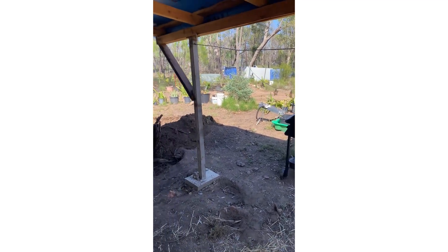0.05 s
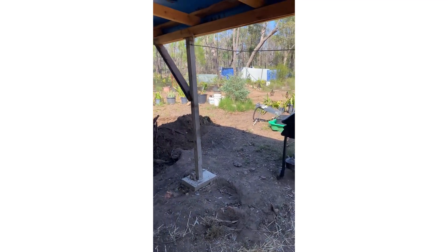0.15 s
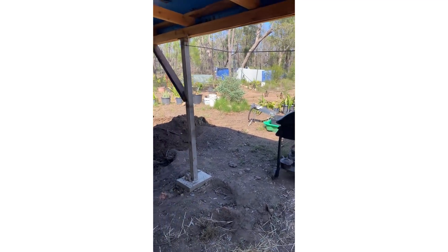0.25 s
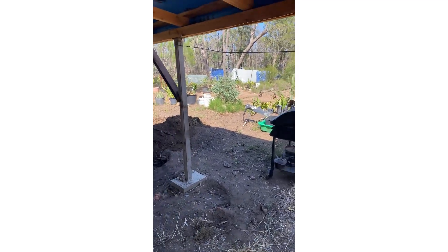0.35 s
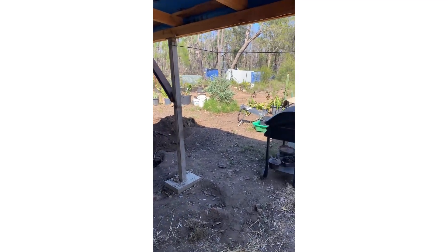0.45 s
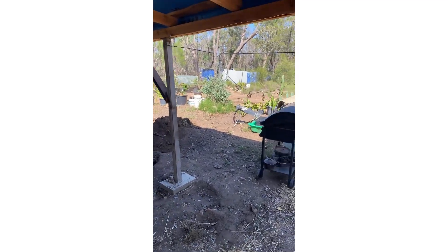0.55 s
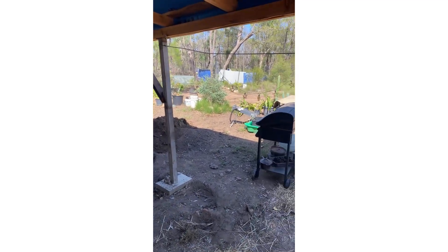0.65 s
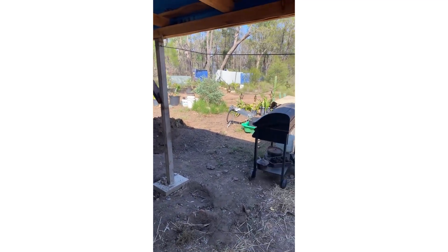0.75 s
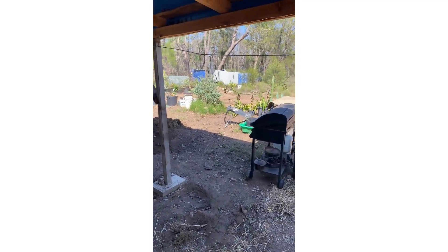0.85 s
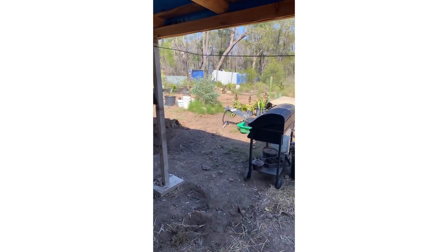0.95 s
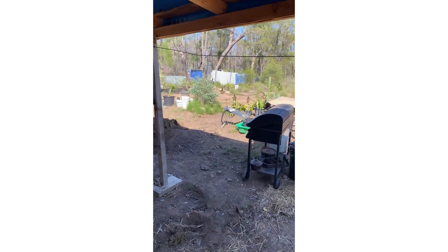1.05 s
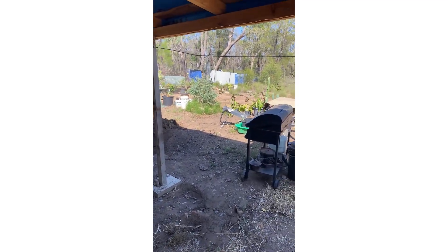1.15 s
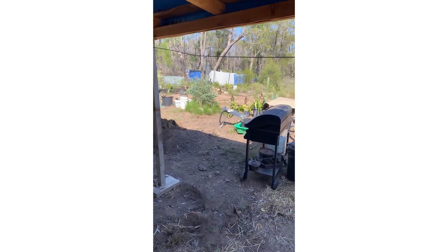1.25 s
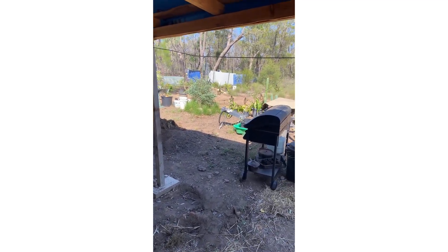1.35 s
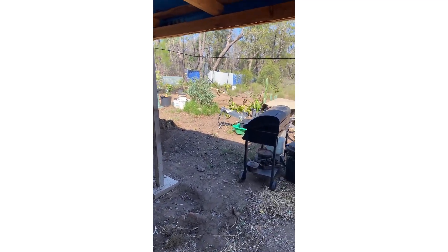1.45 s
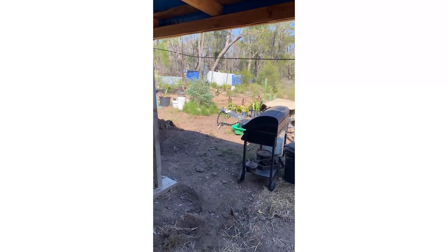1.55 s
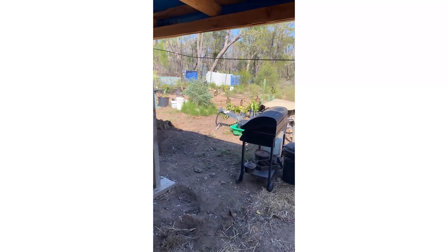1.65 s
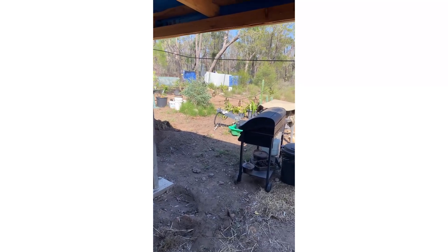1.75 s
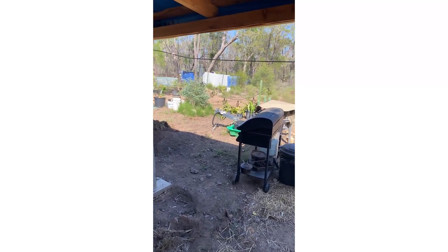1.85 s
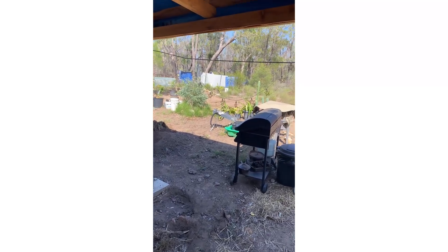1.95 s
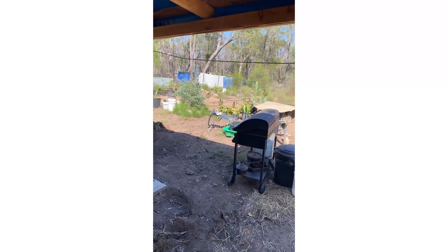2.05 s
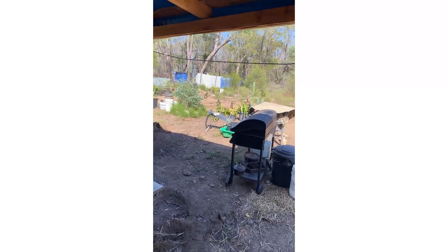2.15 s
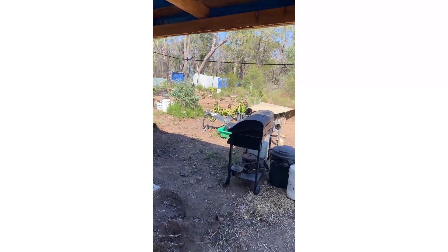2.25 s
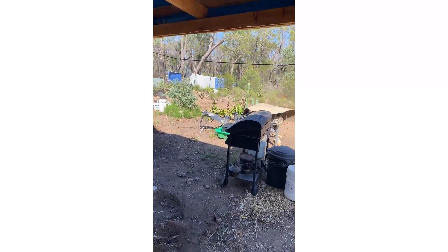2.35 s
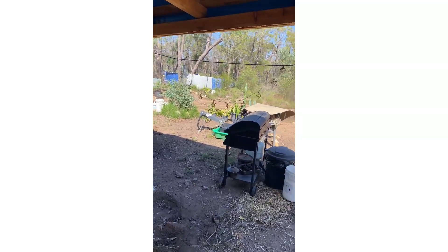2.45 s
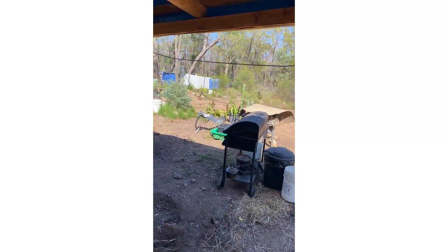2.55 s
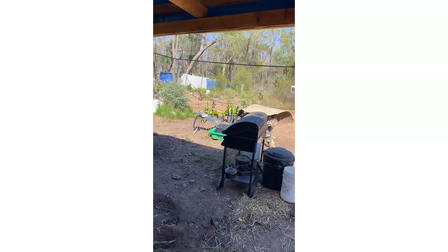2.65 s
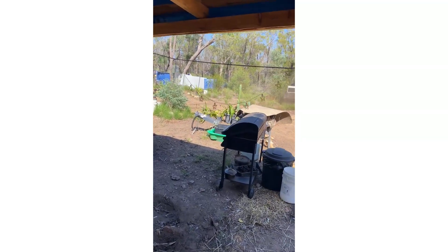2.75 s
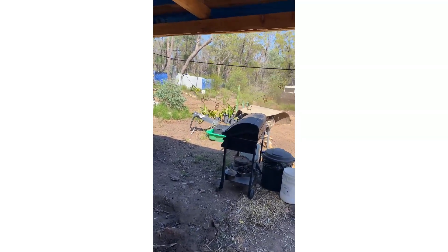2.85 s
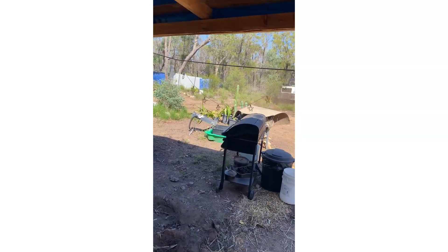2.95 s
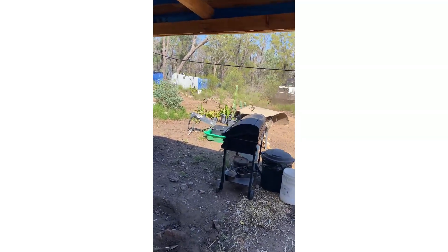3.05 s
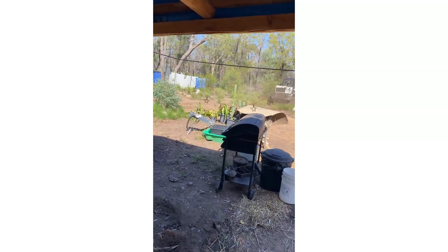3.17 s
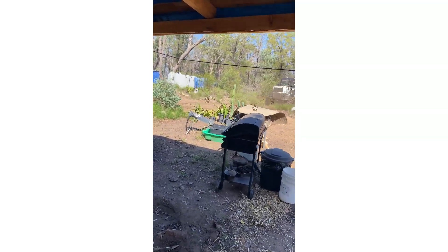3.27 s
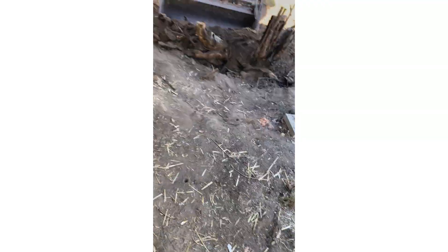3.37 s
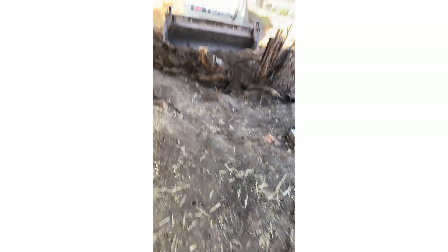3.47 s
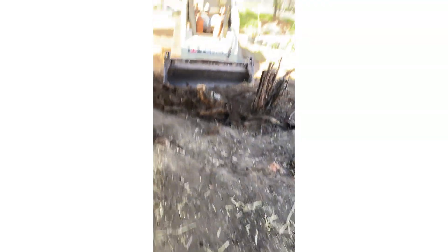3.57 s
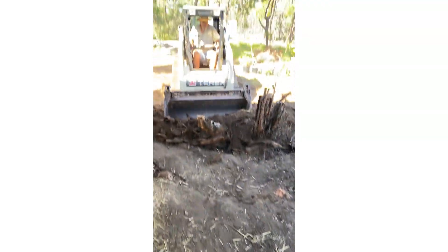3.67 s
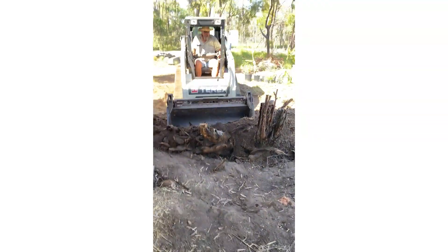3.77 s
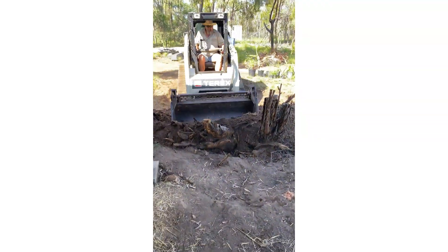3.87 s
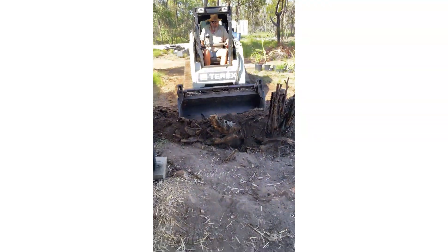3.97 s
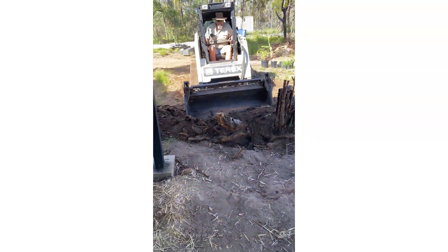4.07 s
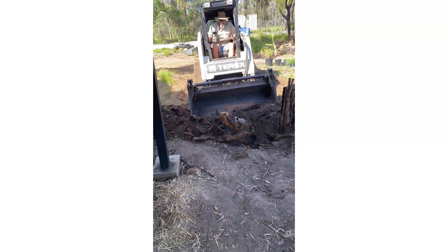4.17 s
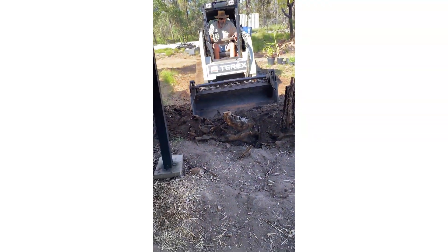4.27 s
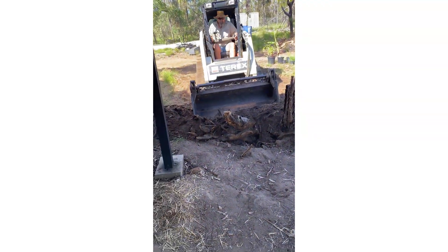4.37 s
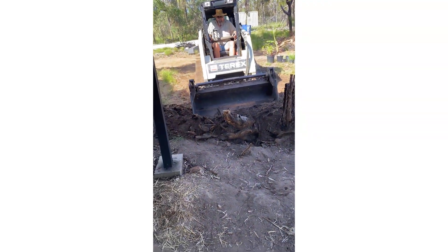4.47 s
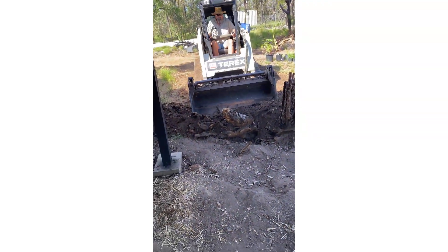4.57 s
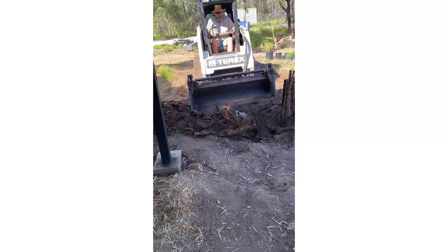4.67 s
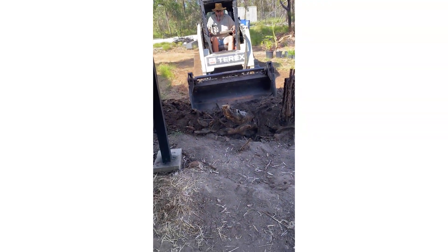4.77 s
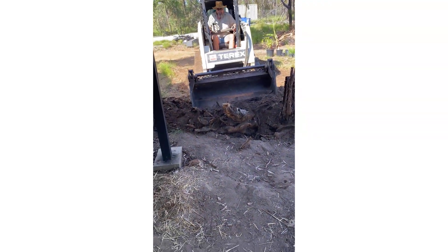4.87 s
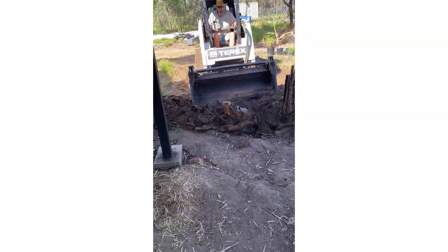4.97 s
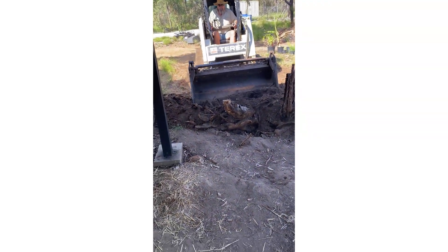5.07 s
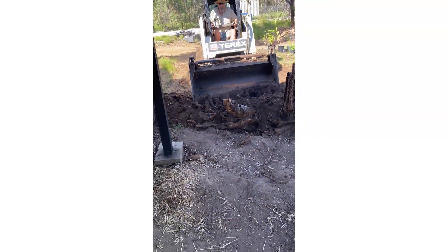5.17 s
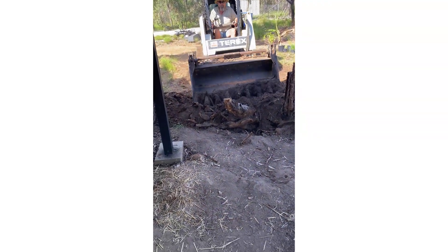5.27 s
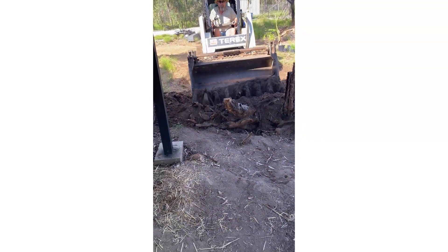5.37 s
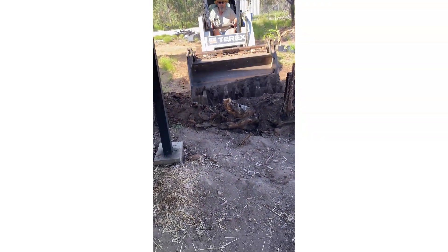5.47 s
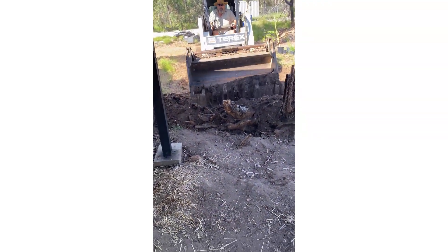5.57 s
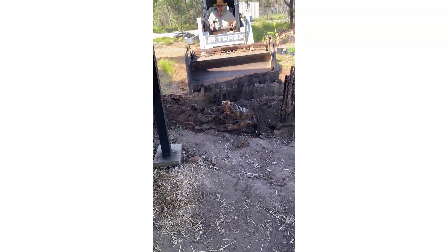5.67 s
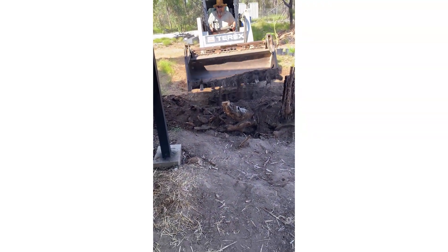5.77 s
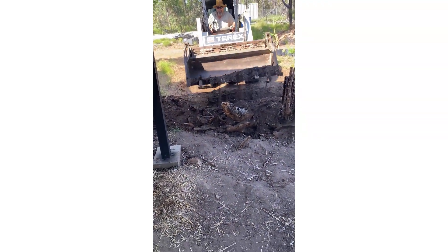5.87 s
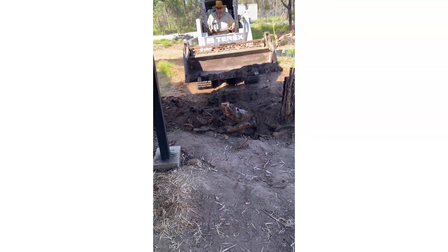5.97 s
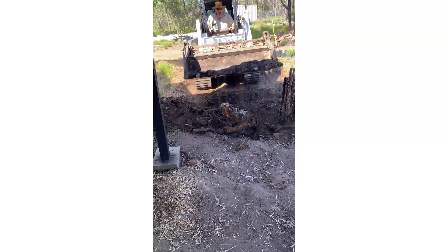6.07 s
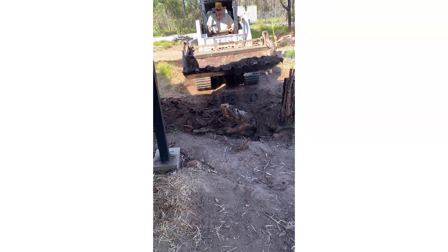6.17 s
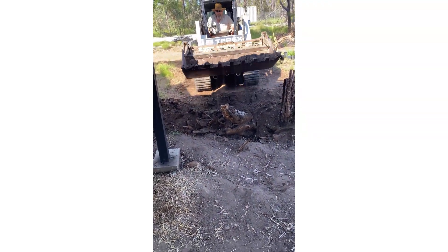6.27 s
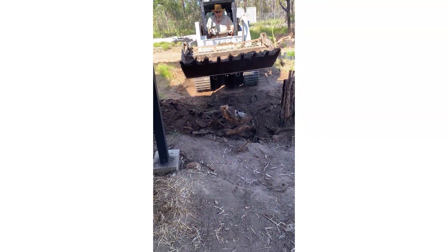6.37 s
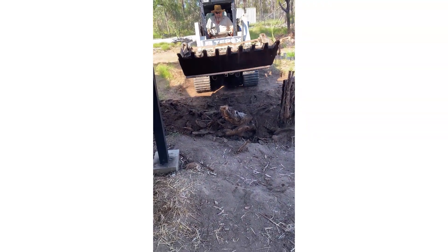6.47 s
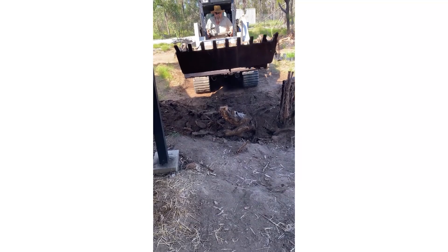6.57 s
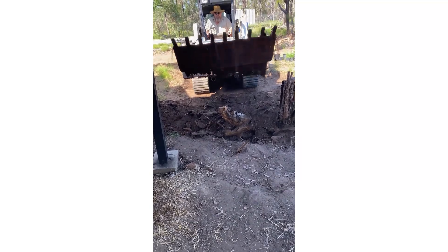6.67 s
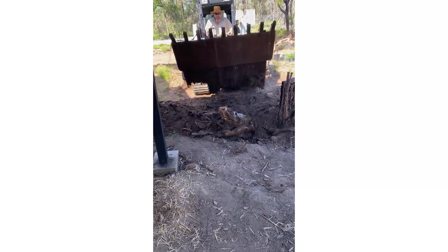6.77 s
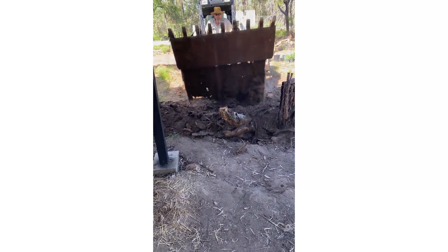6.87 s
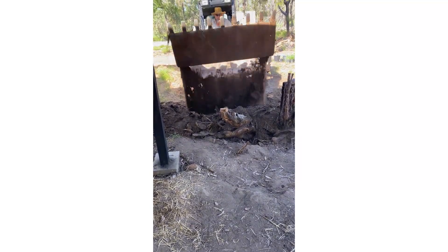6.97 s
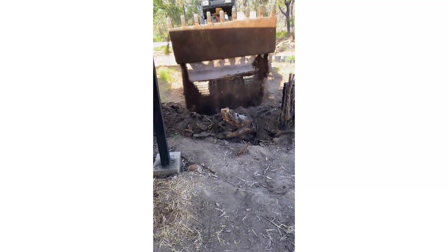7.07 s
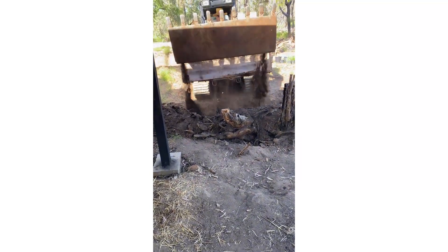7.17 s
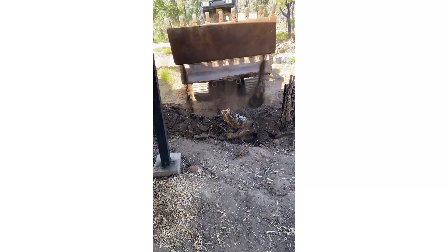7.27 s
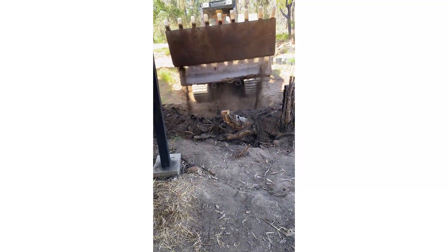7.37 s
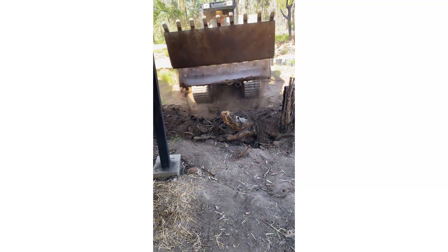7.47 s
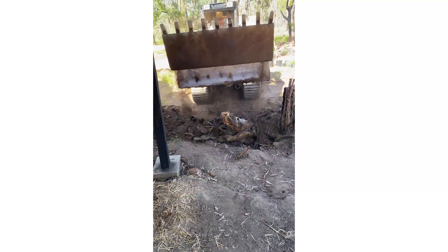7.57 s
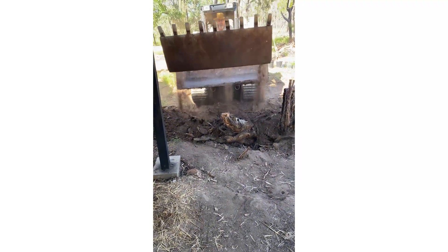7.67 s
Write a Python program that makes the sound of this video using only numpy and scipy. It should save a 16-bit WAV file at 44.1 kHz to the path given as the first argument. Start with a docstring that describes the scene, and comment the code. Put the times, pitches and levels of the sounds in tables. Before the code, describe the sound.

Heard from under a porch roof on a phone, a small tracked loader's diesel hums and clatters continuously. Early thuds, dry ticks and hollow wood knocks lead into quick track squeaks. After a sharp metal clank the sound turns more direct: the bucket knocks, dirt crunches, a pivot groans and hydraulic pumps whine. The engine strains near the end under a dense flurry of clangs and deep thuds.

```python
"""A tracked skid-steer loader works in a yard, heard through a phone from under a porch roof. Its diesel hums
on firing orders that grow with effort, over noise pulsed by each firing. Early on earth thuds, link ticks and
hollow wood knocks are heard; then the tracks squeak. At mid-scene the scene changes to the loader heard from
the front: struck modes of the steel bucket ring, grains of dirt crunch, a pivot pin groans and the pumps whine
in swells, before a last flurry of clangs and thuds."""
import sys
import numpy as np
from scipy import signal
from scipy.fft import rfft, irfft
from scipy.io import wavfile

SR = 44100
rng = np.random.default_rng(int(sys.argv[2]) if len(sys.argv) > 2 else 0)


def inscribe(sig):
    """Save sig as 16-bit PCM at rate SR to the path in sys.argv[1].

    A 1-D sig is mono; a 2-D sig holds one channel per row.
    Samples are clipped to [-1, 1] before scaling.
    """
    pcm = np.round(np.clip(np.atleast_2d(sig).T, -1, 1) * 32767)
    wavfile.write(sys.argv[1], SR, pcm.astype(np.int16))


N = 340672
TIME, FREQS = np.arange(N) / SR, np.fft.rfftfreq(N, 1 / SR)

# engine speed: (time [s], firing rate [Hz])
SPEED = [(0.0, 69), (0.28, 67.87), (0.62, 67.13), (0.99, 66.4), (1.44, 70.38), (1.91, 68.34), (2.34, 61.1),
         (2.9, 61.39), (3.27, 53.96), (3.31, 53.98), (3.4, 62.73), (3.55, 70.2), (4.11, 61.48),
         (4.34, 65.78), (4.49, 60.82), (5.1, 59.57), (5.43, 60.8), (5.8, 60.95), (6.17, 61.55),
         (6.42, 60.34), (6.62, 56.62), (6.74, 54.82), (6.95, 57.9), (7.14, 57.88), (7.3, 61), (7.45, 63.32),
         (7.72, 64.67)]
# how hard the engine works: (time [s], effort over light running [dB])
EFFORT = [(0, -1.5), (.2, -0.5), (.3, -12), (.45, -4), (.9, -0.5), (1.04, 4), (1.15, -2), (1.3, 0),
          (1.38, -8), (1.46, -3), (1.7, -11), (1.98, 0), (2.4, 12.5), (2.88, 2.5), (3.0, -3.5), (3.35, -5),
          (3.62, 4), (3.8, 3), (4.04, 6.5), (4.2, -3), (4.5, -4), (4.65, 3), (5.9, -0.5), (6.55, 9),
          (6.85, 15.5), (7.25, 15.5), (7.72, 11.5)]
# short low booms, probably the phone being handled: (start [s], length [s], level at the firing rate [dB])
BOOMS = [(3.372, .125, -26.5), (4.32, .1, -28.5)]
# casing rumble, the reference for exhaust overtones and puffs: (time [s], level [dB])
RUMBLE_LEVEL = [(0, -51.5), (.28, -45), (.6, -43), (1.3, -45.5), (1.5, -56.5), (2.0, -53.5), (2.45, -43),
                (3.3, -47.5), (3.9, -39.5), (4.25, -45.5), (4.65, -49.5), (5.5, -44), (6.95, -40),
                (7.27, -33.5), (7.72, -46)]
# hiss of fan and tracks, which the clatter partly follows: (time [s], level [dB])
HISS_LEVEL = [(0, -44), (.6, -41), (1.6, -45), (2.85, -47.5), (3.2, -46.5), (3.42, -50), (4.2, -49),
              (5.0, -53.5), (6.2, -54.5), (7.1, -49.5), (7.72, -51.5)]
# spectrum of fine grit: (frequency [Hz], density [dB per Hz])
FINE_GRIT = [(4000, -1), (6500, -1.5), (8500, -1), (10000, -3.5), (12000, -9), (13500, -28), (15500, -15)]
# the scene changes at this moment; afterwards the loader is heard from the front
FACING_S = 3.376
# base level of the block's drone before and after that moment
BLOCK_AWAY_DB, BLOCK_FACING_DB = -40, -37.5


def amp(db):
    """Decibels to gain."""
    return 10 ** (np.asarray(db) / 20)


def unit(x):
    """Scales to rms 1."""
    return x / np.sqrt(np.mean(x ** 2) + 1e-20)


def curves(rows):
    """Each column of a table, joined by straight lines in time."""
    s, *columns = np.transpose(rows)
    return [np.interp(TIME, s, c) for c in columns]


def at_hz(points, hz):
    """Reads a spectrum on a log-frequency axis."""
    f, value = np.transpose(points)
    return np.interp(np.log(hz + 1), np.log(f + 1), value)


def colour(x, spectrum):
    """Filters x by a spectrum and scales it to rms 1."""
    return unit(irfft(rfft(x) * amp(at_hz(spectrum, FREQS)), N))


def drift(rate_hz, size=4096):
    """Slow random wander of about rms 1."""
    hz = np.fft.rfftfreq(size, N / SR / size)
    slow = irfft(rfft(rng.standard_normal(size)) / (1 + (hz / rate_hz) ** 4), size)
    return np.interp(TIME, np.linspace(0, N / SR, size), unit(slow))


def noise():
    """White noise for two microphone ports."""
    return rng.standard_normal((2, N))


def grit(per_s, spread_db):
    """Sparse clicks of uneven size."""
    size = amp(spread_db * np.minimum(rng.exponential(1, N), 4))
    clicks = rng.random(N) < per_s / SR
    return unit(size * clicks * noise())


def tone(turns, level_db, rough, flutter_hz):
    """A line whose strength and phase flutter."""
    flutter = 1 + rough * (drift(flutter_hz) + 1j * drift(flutter_hz))
    return amp(level_db) * unit((flutter * np.exp(2j * np.pi * turns)).real)


def facing(away, towards):
    """One value before the scene changes, another after it."""
    return np.where(TIME < FACING_S, away, towards)


def held(rows, attack_s, release_s):
    """Gains of sounds that rise, hold and die away: one for each level column."""
    total = 0
    for s, length, *levels in rows:
        rise = np.clip((TIME - s) / attack_s, 0, 1)
        fall = np.exp(-np.maximum(TIME - s - length, 0) / release_s)
        total = total + amp(levels)[:, None] * rise * fall
    return total


def add(mix, s, sound):
    """Mixes a sound in at time s."""
    part = mix[:, max(round(s * SR), 0):][:, :sound.shape[1]]
    part += sound[:, :part.shape[1]]


def rings(rows, width, rise_s, trim_db):
    """Short rings in a cluster of modes about each pitch; width is a share of that pitch."""
    out, t = np.zeros((2, N)), np.arange(SR // 4) / SR
    hz = np.fft.rfftfreq(len(t), 1 / SR) + 1
    for s, db, pitch, t60 in rows:
        cluster = 1 / (1 + ((hz / pitch - pitch / hz) / (2 * width)) ** 2)
        envelope = amp(db + trim_db - 60 * t / t60) * (1 - np.exp(-t / rise_s))
        phases = np.exp(2j * np.pi * rng.random((2, len(hz))))
        ring = envelope * irfft(cluster * phases, len(t))
        # each ring carries the energy of its envelope
        add(out, s, ring * np.linalg.norm(envelope) / np.linalg.norm(ring, axis=1, keepdims=True))
    return out


def firing_turns():
    """Count of firings since the start; the governor hunts a little about the set speed."""
    hunting = 1 + .003 * drift(4) + .009 * drift(16)
    return np.cumsum(curves(SPEED)[0] * hunting) / SR


def firing_beat(turns):
    """Each firing is a jolt that dies away, and its strength flutters."""
    return unit((1.0 + np.exp(-(turns % 1) / 0.35)) * amp(1.5 * drift(46)))


def gear_train(turns, size=2048):
    """Valves and gear teeth repeat a slowly changing pattern every four firings, evenly loud."""
    place = (turns / 4 % 1) * size
    steps = np.arange(size)
    patterns = np.array([[np.interp(place, steps, p) for p in ear]
                         for ear in rng.standard_normal((2, 4, size))])
    blend = np.array([drift(2.1) for _ in range(4)])
    return unit((patterns * blend).sum(1) / np.linalg.norm(blend, axis=0))


def exhaust(turns):
    """Three firing orders grow with effort; four uneven cylinders add rougher quarter orders."""
    # firing orders 1 to 3: (level in light running [dB], gain per dB of effort [dB])
    order_law = [(-40, 1.0), (-41, 1.0364), (-48.5, 1.1)]
    # steady pushes: (start [s], length [s], rise [s], second order [dB], third order [dB])
    pushes = [(0.07, 0.76, 0.1, -34.5, -66), (2.085, 0.78, .33, -37, -32.5), (3.505, 0.1, .02, -56, -34.5),
              (4.96, 1.56, 0.01, -27.5, -37), (6.574, 0.25, .06, -32, -25.5), (6.87, 0.32, 0.056, -25, -39)]
    # upper orders: (multiple of the firing rate, level against the rumble [dB])
    overtones = [(1.25, -10), (2.25, -12), (2.5, -3), (2.75, -8), (3.25, -4), (3.5, -6), (4, -4),
                 (4.5, -6.5), (5, -10.5), (5.5, -11), (6, -12)]
    boom_step = amp(-7.5)  # a boom weakens by this much per order
    effort_db, rumble_db = curves(EFFORT)[0], curves(RUMBLE_LEVEL)[0]
    first, second, third = (amp(db + share * effort_db) for db, share in order_law)
    # the low booms are carried on the same three lines
    boom, = held(BOOMS, attack_s=0.01, release_s=0.011)
    push_second, push_third = sum(held([(s, length, *levels)], rise_s, release_s=0.038)
                                  for s, length, rise_s, *levels in pushes)
    # the causes add up in power
    first = np.hypot(first, boom)
    second = np.hypot(second, np.hypot(push_second, boom * boom_step))
    third = np.hypot(third, np.hypot(push_third, boom * boom_step ** 2))
    note = first * tone(turns, 0, rough=.13, flutter_hz=12)
    note += second * tone(2 * turns + .5, 0, rough=.14, flutter_hz=22)
    note += third * tone(3 * turns + .5, 0, rough=.2, flutter_hz=16)
    for order, db in overtones:
        note += tone(order * turns + rng.random(), rumble_db + db, rough=0.35, flutter_hz=5)
    return note


def puffs(turns, uneven):
    """Every firing leaves the pipe as a short puff, each of a different strength."""
    # one puff: (frequency [Hz], density [dB per Hz])
    puff_spectrum = [(140, -23), (215, 7), (290, 2), (400, -5.5), (600, -8), (1000, -4), (2500, -44.5)]
    fired = np.diff(np.floor(turns), prepend=0)
    strength = 1 + uneven * rng.standard_normal(N)
    return colour(fired * strength, puff_spectrum) * amp(curves(RUMBLE_LEVEL)[0] - 5.5)


def casing_rumble(turns):
    """Each firing shakes the casing into low noise; the short low booms add to it."""
    # (frequency [Hz], density [dB per Hz])
    rumble_spectrum = [(20, -38), (45, -25), (80, 12.5), (105, 5), (150, 6.5), (210, 3), (300, 5.5),
                       (400, 4), (520, -4.5), (800, 2), (2000, -50)]
    chug = .45 + np.exp(-(turns % 1) / .28)
    boom, = held(BOOMS, attack_s=0.0092, release_s=0.017)
    steady = amp(curves(RUMBLE_LEVEL)[0] + 4.5 + 3.1 * drift(2.9))
    return colour(noise() * chug, rumble_spectrum) * np.hypot(steady, boom * amp(-10))


def block_drone(turns, beat):
    """The block drones with firing jolts, gear patterns and clicks, a little louder with effort."""
    # (frequency [Hz], density [dB per Hz])
    block_spectrum = [(150, -27), (400, -13), (560, 1.5), (750, 6), (860, 1), (940, 1.5), (1040, -9.5),
                      (1300, -13), (3000, -42)]
    effort_share = 0.12  # dB per dB of effort
    level_db = facing(BLOCK_AWAY_DB, BLOCK_FACING_DB) + effort_share * curves(EFFORT)[0]
    shake = noise() * beat + gear_train(turns)
    clicks = grit(per_s=180, spread_db=-5.5)
    return colour(shake + 0.22 * clicks, block_spectrum) * amp(level_db + 1.23 * drift(18))


def clatter(turns, beat):
    """Diesel clatter pulses with the firings and partly follows the level of the hiss."""
    # (frequency [Hz], density [dB per Hz])
    clatter_spectrum = [(500, -24), (1000, 1.5), (1250, 2.5), (1550, 3), (1850, -2), (2300, -1.5),
                        (3100, -4.5), (4200, -12), (8000, -56), (16000, -61)]
    usual_hiss_db, usual_clatter_db, hiss_share = -50, -42.5, 0.38
    level_db = usual_clatter_db + hiss_share * (curves(HISS_LEVEL)[0] - usual_hiss_db)
    rattle = noise() * beat + gear_train(turns)
    ticks = grit(per_s=160, spread_db=1) * beat
    return colour(rattle + 0.41 * ticks, clatter_spectrum) * amp(level_db + 1.48 * drift(8.9))


def gears(turns):
    """The timing gears growl on high orders that slide with the engine speed."""
    # (multiple of the firing rate, level against the block's base level [dB])
    gear_tones = [(11, -14), (12.5, -19), (13, -15), (14, -12.5), (15, -17), (21, -19), (23.5, -25.5),
                  (32, -22.5), (34.5, -19.5)]
    drone_db = facing(BLOCK_AWAY_DB, BLOCK_FACING_DB)
    return sum(tone(multiple * turns + rng.random(), drone_db + db + 1.6 * drift(1.1),
                    rough=0.43, flutter_hz=10) for multiple, db in gear_tones)


def panel_buzz(turns):
    """A loose panel buzzes most when the engine lugs near one firing rate."""
    # (frequency [Hz], density [dB per Hz])
    panel_spectrum = [(1400, -24), (1850, -7), (2000, -1), (2180, -18), (2550, -43), (2850, -1),
                      (3150, -35), (4500, -50)]
    buzz_at_hz, half_width_hz = 58.7, 4.7
    lugging = 1 / (1 + ((curves(SPEED)[0] - buzz_at_hz) / half_width_hz) ** 2)
    cycle = (turns / 4) % 1  # four firings
    buzz = colour(noise() * (.5 + np.exp(-cycle / 1.1)), panel_spectrum)
    return buzz * lugging * amp(facing(-43, -52) + 3.2 * drift(18))


def pump_whines(turns):
    """The hydraulic pumps are geared to the crank and whine in swells."""
    # (middle [s], length [s], multiple of the firing rate, level before a 0.5 dB cut [dB])
    swells = [(4.56, 1, 6.5, -43), (5.202, 0.27, 6.5, -34.5), (5.559, 0.49, 6.5, -34.5),
              (5.95, 0.74, 6.5, -44), (6.434, 0.47, 6.5, -37.5), (4.6, 0.31, 9, -44), (5.29, 0.78, 9, -44),
              (6.514, 0.57, 9, -40), (6.966, 0.52, 9, -34), (0.38, 1, 6.5, -47.5), (3.65, .25, 12, -43),
              (3.75, .28, 13, -29), (4.08, .25, 14, -48), (4.51, 0.13, 6.5, -43), (0.43, 0.59, 14, -56),
              (5.35, 0.66, 13, -46), (6.87, .35, 13, -41), (7.38, 0.36, 13, -38)]
    out = np.zeros(N)
    for middle, length, multiple, db in swells:
        swell = np.cos(np.pi * np.clip((TIME - middle) / length, -.5, .5))
        out += swell * tone(multiple * turns, db - .5, rough=0.26, flutter_hz=13)
    return out


def knocks(crack, crack_s, tail_db, tail_t60, ring_db, ring_width, ring_t60, level_db):
    """Each blow cracks and rings the bucket's dense modes, two resonances and its plate."""
    # bucket and linkage: (time [s], rise time constant [s], clang [dB], body [dB],
    # brightness [dB per octave], low ring [Hz], high ring [Hz], plate [dB]);
    # clang and body are before level_db
    blows = [(3.1096, 0.00062, -28, -24, -3, 730, 1950, -24), (3.165, .001, -44, -30, 2, 735, 1400, -40),
             (3.208, .003, -34, -43, -22, 710, 1933, -43), (3.4845, 0.0004, -54, -26.5, -6, 663, 1330, -58),
             (3.938, 0.0022, -35, -27, -4, 657, 2060, -32), (4.113, 0.0046, -30, -25, -18, 944, 1670, -39),
             (4.1863, 0.0016, -39, -43, -13, 760, 1680, -35),
             (4.305, .001, -57.5, -42, 10.5, 770, 3700, -57),
             (4.338, 0.0054, -31.5, -31, -6.5, 1070, 1780, -45),
             (4.372, .002, -42, -41, -17, 770, 1400, -46), (4.4932, 0.0024, -37.5, -45, -8, 774, 2280, -43),
             (4.763, .001, -37, -21.5, -12, 790, 1300, -40), (4.8963, 0.00058, -40, -24, 9, 630, 3350, -38),
             (4.9114, .0009, -32, -21.5, -7, 660, 3400, -36), (6.16, .0003, -52, -33, -8, 800, 1410, -48),
             (6.233, 0.0011, -44, -26, 11.5, 884, 6000, -43),
             (6.6479, 0.0011, -27.5, -19, -5.5, 970, 2400, -22.5),
             (6.657, .0006, -28.5, -18, -4.5, 810, 3350, -24),
             (6.667, 0.0013, -35.5, -18.5, -8, 730, 4020, -28),
             (6.678, .001, -35, -29, -15, 617, 2150, -31), (7.134, 0.0013, -42.5, -25, 11, 597, 1990, -49),
             (7.1404, 0.00037, -27.5, -40, -21, 552, 1760, -32),
             (7.1445, .0004, -44, -40, 2, 690, 3400, -29), (7.151, 0.0004, -40, -30, 5, 690, 3700, -32),
             (7.16, .0005, -43, -22, 5, 600, 2200, -37), (7.171, .0005, -34, -23.5, -19, 690, 1400, -42),
             (7.184, .0005, -45, -25, -15, 690, 1260, -45),
             (7.2125, 0.0006, -36.5, -30, 4.5, 790, 2190, -38),
             (7.225, 0.00054, -39, -25, 0.5, 500, 2330, -32), (7.2517, .001, -39, -24, -22, 840, 1850, -40),
             (7.2845, .0008, -32.5, -21, -3, 684, 1240, -36),
             (7.2925, 0.00038, -35.5, -22, -10, 497, 1510, -39),
             (7.4915, 0.00088, -24, -46, 5, 2400, 4240, -28), (7.4985, .0008, -34, -47, 5, 1448, 5700, -31),
             (7.513, 0.00092, -32, -42, -8, 1470, 2540, -40),
             (7.627, 0.0018, -40.5, -48, 1.5, 895, 3300, -47),
             (7.6905, 0.00083, -48.5, -27, 7.5, 858, 3240, -50)]
    # resonances of the bucket steel: (frequency [Hz], width [Hz], gain over the broad ring [dB])
    steel_modes = [(667, 72, 4), (1033, 15, 14), (1460, 26, -1), (1920, 92, -3), (2530, 550, 0),
                   (3150, 1100, 6.5), (4580, 390, 3.5), (5070, 470, 0.5), (6060, 620, 5),
                   (9540, 500, -10.5)]
    # dull body and clang that all blows share: (frequency [Hz], density [dB per Hz])
    body_spectrum = [(120, -14), (700, 2), (1300, -13), (2600, -54)]
    clang_spectrum = [(120, -27), (700, -19), (1300, 4.5), (2600, 1), (4300, -0.5), (6800, -12.5),
                      (9500, -13.5), (11500, -30.5), (13000, -35), (15500, -56)]
    # clear plate modes: (frequency [Hz], level [dB], t60 [s])
    plate_modes = [(598, -11.5, 0.36), (735, -10.5, 0.29), (819, -6.5, 0.19), (946, -14, 0.28),
                   (1256, -9, .2), (1467, -12, 0.15), (1915, -11.5, 0.17), (2260, -6, 0.065),
                   (2365, -6.5, 0.11), (2566, -6, 0.14), (2836, -4.5, 0.17), (3400, -26, 0.092),
                   (3400, -12.5, 0.17), (4010, -12, 0.13), (4890, -18, 0.16), (5770, -14, .08)]
    bright_from_hz, knock_t60, detune = 2230, 0.12, 0.0067
    out, t = np.zeros((2, N)), np.arange(SR // 4) / SR
    hz = np.fft.rfftfreq(len(t), 1 / SR)
    steel = 1 + sum((amp(db) - 1) / (1 + (2 * (hz - f) / width) ** 2) for f, width, db in steel_modes)
    octaves = np.log2(np.maximum(hz / bright_from_hz, 1))
    # a brief crack, the ring of the steel, and a faint tail from the yard
    decay = crack * np.exp(-t / crack_s) + amp(-60 * t / knock_t60) + amp(tail_db - 60 * t / tail_t60)
    ring_decay = amp(ring_db - 60 * t / ring_t60)
    for s, rise_s, clang_db, body_db, bright_db, low_hz, high_hz, plate_db in blows:
        body = amp(body_db + at_hz(body_spectrum, hz))
        clang = amp(clang_db + at_hz(clang_spectrum, hz) + bright_db * octaves)
        # rough faces chatter against each other as they meet
        chatter_db = 2.2 * rng.standard_normal(len(t) // 50 + 1).repeat(50)[:len(t)]
        contacts = rng.standard_normal((2, len(t))) * amp(chatter_db)
        struck = rfft(unit(contacts)) * steel * np.hypot(body, clang)
        spot = sum(1 / (1 + ((hz / f - 1) / ring_width) ** 2) for f in (low_hz, high_hz))
        sound = irfft(struck, len(t)) * decay + irfft(struck * spot, len(t)) * ring_decay
        plate = 0
        for f, db, t60 in plate_modes:
            mode_db = plate_db + db + bright_db * np.log2(max(f / bright_from_hz, 1))
            # each mode is a randomly detuned pair, which beats
            for split in 1 + detune * rng.uniform(-1.1, 1, 2):
                wave = np.sin(2 * np.pi * (f * split * t + rng.random((2, 1))))
                plate = plate + amp(mode_db - 60 * t / t60) * wave
        add(out, s, (amp(level_db) * sound + plate) * (1 - np.exp(-t / rise_s)))
    return out


def thuds():
    """Earth and bumps land with a short, dull ring."""
    # (time [s], level before a 2 dB cut [dB], centre [Hz], t60 [s])
    landings = [(.72, -20, 275, 0.12), (.793, -22, 171, 0.13), (3.372, -25, 45, 0.07),
                (3.379, -23.5, 219, .11), (3.405, -22, 415, 0.064), (3.43, -24, 310, .07),
                (3.4845, -13.5, 684, 0.029), (3.7335, -30, 400, 0.064), (3.9021, -26, 362, .07),
                (4.025, -23, 448, 0.12), (4.05, -28, 507, 0.091), (4.128, -21.5, 187, 0.067),
                (4.175, -30, 168, 0.056), (4.372, -25, 440, 0.1), (6.159, -19, 800, 0.028),
                (6.236, -20.5, 173, 0.2), (7.142, -17, 372, 0.15), (7.16, -20, 235, 0.08),
                (7.178, -10.5, 220, 0.06), (7.222, -20, 310, 0.092), (7.243, -5.5, 154, 0.079),
                (7.287, -15.5, 338, 0.12), (7.42, -24, 350, 0.14)]
    return rings(landings, width=0.15, rise_s=0.0034, trim_db=-2.0)


def groans(attack_s, fade_db):
    """A dry pivot pin sings narrow gliding notes as the arms take the load; each fades."""
    # (start [s], length [s], start pitch [Hz], end pitch [Hz], starting level [dB])
    notes = [(4.763, .05, 645, 622, -19), (4.897, .072, 616, 662, -13)]
    out = np.zeros((2, N))
    for s, length, start_hz, end_hz, db in notes:
        t = np.arange(0, length, 1 / SR)
        cycles = np.cumsum(start_hz + (end_hz - start_hz) * t / length) / SR
        edges = np.minimum(np.minimum(t, length - t) / attack_s, 1)
        envelope = edges * amp(db + fade_db * t / length)
        # a quarter cycle apart before the ports mix them
        add(out, s, envelope * np.array([np.sin(2 * np.pi * cycles), np.cos(2 * np.pi * cycles)]))
    return out


def spills():
    """Dirt sliding on the bucket is a shower of grains: coarse ones crunch, fine ones fizz."""
    # (start [s], length [s], crunch [dB], fine sand [dB])
    slides = [(3.76, 0.29, -44, -67), (4.11, 0.12, -41.5, -66), (4.305, 0.08, -41, -63),
              (4.48, 0.037, -44, -54), (6.24, 0.11, -40.5, -52), (7.0, 0.16, -57, -53),
              (7.125, 0.17, -40, -58)]
    # dry soil: (frequency [Hz], density [dB per Hz])
    crunch_spectrum = [(200, -24), (600, -17), (1200, -2.5), (2400, -1), (3600, -5), (6000, -21),
                       (8000, -30), (15500, -55)]
    coarse, fine = held(slides, attack_s=0.0022, release_s=0.024)
    lumps, sand = grit(per_s=1500, spread_db=2), grit(per_s=9000, spread_db=0)
    return coarse * colour(lumps, crunch_spectrum) + fine * colour(sand, FINE_GRIT)


def wood_knocks():
    """Bumped wood rings hollowly in a few modes; glancing blows favour the upper ones."""
    # (time [s], level before a 3 dB cut [dB], tilt towards upper modes [dB per octave])
    bumps = [(.832, -25, -10), (.84, -18, -4.5), (.848, -21, 0), (1.183, -26, 4.5), (1.199, -22, 2),
             (1.215, -30, 2), (1.265, -22.5, 2)]
    # modes of the wood: (frequency [Hz], level [dB], t60 [s])
    wood_modes = [(265, -4, 0.12), (390, -2, 0.065), (505, -0.5, 0.12), (720, -6, .08), (1410, -6, 0.076),
                  (1520, -12.5, 0.12)]
    pivot_hz = 510
    rows = [(s, db + mode_db + tilt_db * np.log2(hz / pivot_hz), hz, t60)
            for s, db, tilt_db in bumps for hz, mode_db, t60 in wood_modes]
    return rings(rows, width=0.047, rise_s=0.0025, trim_db=-3.0)


def chirps():
    """A track link squeaks briefly as it rolls over the sprocket."""
    # (time [s], level [dB], pitch [Hz], t60 [s])
    squeaks = [(1.302, -35, 3640, 0.078), (1.305, -37, 2480, .07), (1.432, -36, 2400, .07),
               (1.437, -31, 4730, 0.066), (1.522, -34, 2570, .08), (1.541, -31, 3670, 0.074),
               (1.594, -29, 3660, 0.075), (1.6, -43, 2500, .08), (1.648, -37, 3770, .07),
               (1.673, -29, 2460, 0.06), (1.679, -28, 4650, .06), (1.681, -35, 5130, .06),
               (1.76, -33, 2560, 0.058), (1.765, -34, 5020, 0.039), (1.85, -37, 3550, .08),
               (1.898, -30, 3620, 0.083), (1.919, -30, 3620, 0.085)]
    return rings(squeaks, width=.012, rise_s=.003, trim_db=0)


def link_ticks():
    """Track links snap onto the sprocket with thin, dry ticks of decaying noise."""
    # (time [s], starting level [dB], t60 [s])
    snaps = [(.757, -34, 0.045), (.769, -31.5, 0.054), (0.888, -36, 0.052), (1.355, -35.5, 0.13),
             (1.433, -34, .06), (1.443, -36, 0.044), (1.465, -33, 0.027), (1.525, -35.5, .03),
             (1.621, -39, .03), (1.674, -34, 0.032), (1.682, -41, 0.033), (1.704, -42, .04),
             (1.762, -36.5, 0.041), (1.86, -31.5, 0.09)]
    # (frequency [Hz], density [dB per Hz])
    tick_spectrum = [(1200, -33), (2400, 3), (3600, -10), (4700, 0.5), (5900, 2), (7000, -13),
                     (10000, -15.5), (13000, -31)]
    gain = sum((TIME >= s) * amp(db - 60 * np.clip(TIME - s, 0, 1) / t60) for s, db, t60 in snaps)
    return gain * colour(noise(), tick_spectrum)


def fan_tone():
    """The cooling fan's blade tone keeps its own pitch, lower after the scene changes."""
    # (time [s], level [dB])
    fan_level = [(0, -46.5), (.45, -37), (1.1, -38), (1.35, -48.5), (1.9, -51), (2.25, -41), (2.9, -36.5),
                 (3.1, -56.5), (3.55, -43.5), (4.15, -39), (4.8, -48), (7.3, -40.5), (7.72, -38.5)]
    blades = np.cumsum(facing(340.2, 328.2)) / SR  # Hz to cycles
    return tone(blades, curves(fan_level)[0], rough=0.26, flutter_hz=12)


def hiss():
    """Fan and tracks hiss: smooth noise with crackling grit."""
    # (frequency [Hz], density [dB per Hz])
    hiss_spectrum = [(800, -38), (2200, -4), (3300, 6.5), (4200, 1.5), (5400, 1.5), (6800, -7),
                     (8000, -7.5), (10000, -50), (15500, -35)]
    crackle = grit(per_s=280, spread_db=2.5)
    level_db = curves(HISS_LEVEL)[0] + 0.5 + 1.0 * drift(54)
    return colour(0.88 * noise() + 0.62 * crackle, hiss_spectrum) * amp(level_db)


def fizz():
    """Loose grit fizzes: fine noise with sparse clicks."""
    # (time [s], level [dB])
    fizz_level = [(0, -52), (.75, -52.5), (1.15, -55), (1.43, -48.5), (2.2, -57.5), (3.15, -53.5),
                  (3.5, -61), (4.55, -56.5), (5.2, -62.5), (7.72, -59)]
    sand = grit(per_s=400, spread_db=0)
    level_db = curves(fizz_level)[0] + 1.76 * drift(19)
    return colour(noise() + 0.22 * sand, FINE_GRIT) * amp(level_db)


def scattered(x, share):
    """Echoes off posts, ground and roof swell and fade, so narrow bands stand out and sink."""
    out = x.copy()
    for delay_s, rate_hz in rng.uniform((.002, .5), (.022, 1.2), (10, 2)):
        out += share * drift(rate_hz) * np.roll(x, round(delay_s * SR), 1)
    return out / np.sqrt(1 + 10 * share ** 2)


def reflected(x, dull_hz):
    """A short dull porch echo combs the sound as its path changes with the moving loader."""
    # (time [s], delay [ms], strength [gain])
    reflection = [(0, 1.6, 0.68), (.8, 1.73, 0.62), (1.5, 1.76, 0.43), (2.5, 1.74, 0.37), (3.2, 1.87, 0.22),
                  (3.6, 1.9, 0.021), (7.72, 1.2, 0.023)]
    delay_ms, strength = curves(reflection)
    echo = irfft(rfft(x) / (1 + (FREQS / dull_hz) ** 2), N)
    delayed = np.array([np.interp(TIME - delay_ms / 1000, TIME, ear) for ear in echo])
    return x - strength * delayed


def machinery(turns):
    """Block, clatter and hiss reach the phone with echoes; rumble, fizz and buzz come direct."""
    beat = firing_beat(turns)
    yard = scattered(block_drone(turns, beat) + clatter(turns, beat) + hiss(), share=.23)
    return casing_rumble(turns) + reflected(yard, dull_hz=3080) + fizz() + panel_buzz(turns)


def ports(pair, hum):
    """Two microphone ports hear noise alike in the bass and top, less so between; hum is shared."""
    # (frequency [Hz], likeness [0 to 1])
    likeness = [(60, 1), (150, 1), (300, 0.96), (470, 0.46), (650, 0.78), (870, 0.092), (1200, 0.54),
                (1550, 0.36), (1850, 0.27), (2350, 0.41), (3100, 0.76), (4100, 0.73), (5500, 0.89),
                (7500, 1), (12000, 0.8)]
    # (frequency [Hz], phase by which left leads [rad])
    port_phase = [(0, 0), (65, -.2), (130, -.28), (330, -.35), (450, -1.2), (650, -2.9), (1200, -3.4),
                  (1900, -4.5), (2700, -3.2), (3900, -4.5), (4500, -4.2), (5300, -5.5), (6200, -4.8),
                  (7500, -3.2), (9800, 0), (11500, 0), (12500, 3.1)]
    # (frequency [Hz], left over right [dB])
    port_balance = [(60, -0.5), (150, -1.3), (300, 0), (600, -3), (1200, -3), (2400, 0.6), (5000, -2.5),
                    (9000, 0.4)]
    a, b = rfft(pair)
    line, same = rfft(hum), np.clip(at_hz(likeness, FREQS), 0, 1)
    lead = np.exp(1j * np.interp(FREQS, *np.transpose(port_phase)))
    tilt = amp(at_hz(port_balance, FREQS) / 2)
    left = (a + line) * lead * tilt
    right = (same * a + np.sqrt(1 - same ** 2) * b + line) / tilt
    return irfft(np.array([left, right]), N)


def scene():
    """The loader with its knocks, falling dirt and track squeaks."""
    turns = firing_turns()
    hum = exhaust(turns) + puffs(turns, uneven=0.56) + gears(turns) + pump_whines(turns) + fan_tone()
    noises = machinery(turns)
    noises += knocks(crack=0.23, crack_s=0.006, tail_db=-14.5, tail_t60=0.24, ring_db=5.0,
                     ring_width=0.039, ring_t60=0.15, level_db=8)
    noises += thuds() + groans(attack_s=0.0055, fade_db=-13) + spills()
    noises += wood_knocks() + chirps() + link_ticks()
    return ports(noises, hum)


def record(dry):
    """The highest peaks are rounded off softly; then the phone's band limit."""
    soft_limit, edge_hz = .66, 15750  # limit as a share of full scale
    rounded = dry / (1 + (dry / soft_limit) ** 4) ** .25
    lowpass = signal.firwin(511, edge_hz, window=("kaiser", 9), fs=SR)
    return signal.oaconvolve(rounded, lowpass[None], "same")


dry = scene()
out = record(dry)
inscribe(out)
```